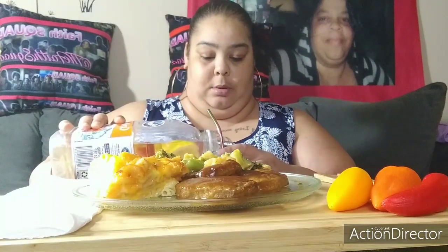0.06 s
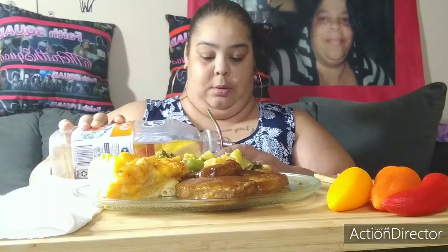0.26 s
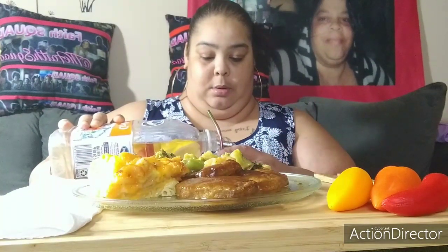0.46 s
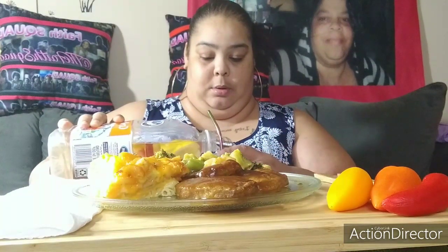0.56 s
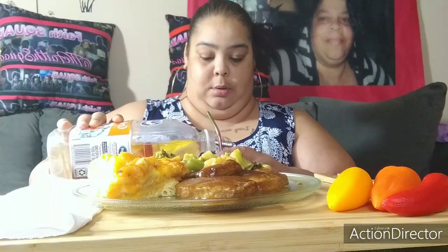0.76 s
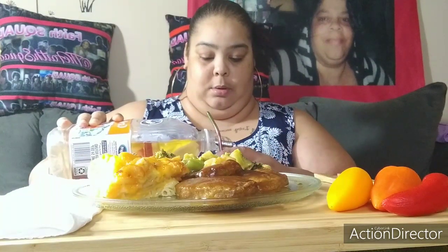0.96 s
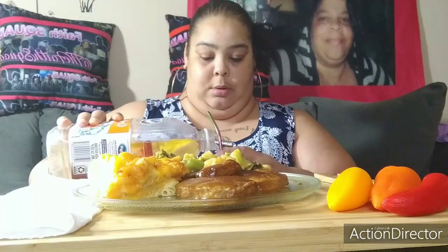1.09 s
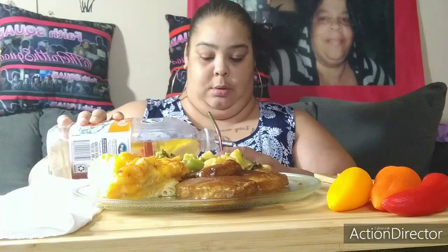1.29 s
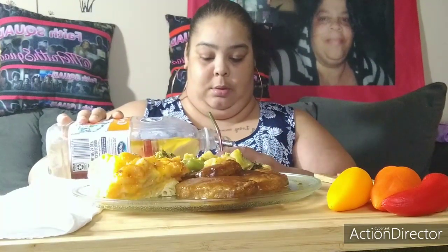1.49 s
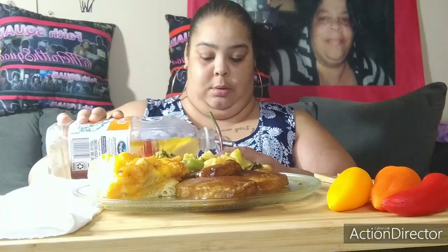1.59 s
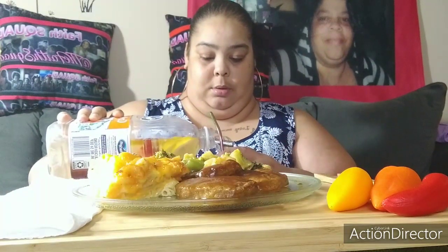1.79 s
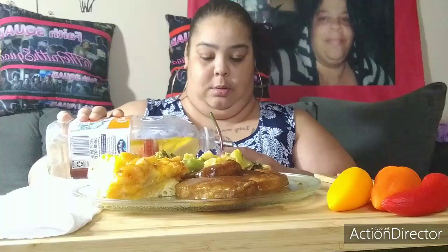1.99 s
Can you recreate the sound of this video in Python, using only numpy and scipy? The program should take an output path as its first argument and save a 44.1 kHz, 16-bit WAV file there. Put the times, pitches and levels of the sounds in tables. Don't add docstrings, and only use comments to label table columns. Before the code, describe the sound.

A drink is poured from a plastic bottle into a plastic cup in irregular glugs and sharp splashes, with bubbles crackling between them, heard close on a phone microphone in a quiet room.

```python
import sys
import numpy as np
from scipy import signal
from scipy.fft import rfft, irfft
from scipy.io import wavfile
from scipy.ndimage import uniform_filter1d

SR = 44100
rng = np.random.default_rng(int(sys.argv[2]) if len(sys.argv) > 2 else 0)


def wav_out(sig):
    wavfile.write(sys.argv[1], SR, np.round(np.clip(np.atleast_2d(sig).T, -1, 1) * 32767).astype(np.int16))


def convert_level_to_amplitude(level_db):
    exponent = np.asarray(level_db, float) / 20
    return 10 ** exponent


N = 90404

# (frequency [Hz], level [dB])
ROOM_SPECTRUM = [(20,-27),(76,3),(250,-2.5),(390,1),(546,-7),(1300,-13),(2200,-31)]
# (time [s], peak level [dB], pitch [Hz])
BOTTLE_THUMPS = [(0.11, -52.5, 62), (0.118, -50, 184), (0.226, -32.5, 288), (0.255, -45, 65.7),
                 (0.258, -39.5, 231), (0.325, -61, 55.4), (0.49, -53.5, 190), (0.608, -34.5, 280),
                 (1.055, -40, 111), (1.075, -35.5, 179), (1.13, -52.5, 60), (1.35, -49, 160),
                 (1.543, -34.5, 148), (1.563, -46, 61.6), (1.608, -35, 78.6), (1.915, -52, 84)]
# (time [s], level [dB])
FLOW_LEVEL = [(0,-59.5),(.3,-56),(.6,-55),(1.17,-57),(1.21,-62),(1.33,-61.5),(1.4,-55.5),(1.5,-62),
              (1.54,-62.5),(1.56,-49),(1.618,-63),(1.66,-59.5),(1.741,-67.5),(1.752,-54),(1.9,-53.5),(2.05,-56)]
# (frequency [Hz], level [dB])
FIZZ_SPECTRUM = [(4200,-24),(4800,-11.5),(5230,8),(6360,-1),(10500,-0.5),(14900,-12),(16000,-6)]
# (time [s], peak level [dB], pitch [Hz])
SINGING_BUBBLES = [(0.0156, -34.5, 9100), (0.0496, -37.5, 6750), (0.079, -32.5, 5800),
                   (0.2985, -32.5, 6200), (0.3061, -34, 5530), (0.3701, -36.5, 6750), (0.505, -37, 6200),
                   (0.63, -33.5, 6130), (0.7721, -38.5, 5940), (0.814, -26, 5110), (0.856, -56, 6600),
                   (0.886, -37.5, 5100), (0.9303, -47, 6600), (1.1358, -30.5, 8360), (1.1441, -35, 9500),
                   (1.1635, -35.5, 5600), (1.1797, -33, 4990), (1.3413, -32.5, 5940), (1.5858, -40, 5900),
                   (1.601, -40, 5040), (1.8203, -37, 5750), (1.8697, -36.5, 5700)]
# (time [s], peak level [dB], pitch [Hz])
BURSTING_BUBBLES = [(0.199, -24, 5100), (0.2328, -27.5, 5040), (0.2772, -29, 9900), (0.3063, -28.5, 5760),
                    (0.3234, -31, 5430), (0.3555, -29.5, 6570), (0.4772, -39, 6460), (0.5127, -33, 6200),
                    (0.5468, -24.5, 8020), (0.5711, -31, 9950), (0.7453, -29.5, 8460),
                    (0.7923, -34.5, 5800), (0.8498, -30, 6000), (0.8623, -29.5, 5500),
                    (0.9004, -30.5, 12200), (0.956, -18.5, 7950), (1.0261, -26, 6260),
                    (1.0486, -25.5, 5860), (1.0765, -26, 5750), (1.2558, -49, 5630), (1.4, -32, 7900),
                    (1.46, -42.5, 5770), (1.4865, -36, 5700), (1.5586, -28, 6100), (1.7503, -30, 5850),
                    (1.7881, -20.5, 5470), (1.9093, -23.5, 7230), (1.9175, -32, 5370), (1.9618, -21, 6440),
                    (2.0208, -24.5, 6250)]
# (time [s], peak level [dB], pitch [Hz])
MORE_BURSTING_BUBBLES = [(0.1346, -50, 5200), (0.1635, -54, 5340), (0.1775, -38.5, 8340), (0.2234, -41, 6350),
                         (0.2573, -30.5, 5300), (0.3371, -28, 5330), (0.4204, -30.5, 8000), (0.4534, -34, 6100),
                         (0.5292, -38, 6240), (0.5985, -51, 6070), (0.6784, -44, 6100), (0.7083, -38, 5700),
                         (0.9817, -30, 5150), (1.1189, -35, 8950), (1.131, -35, 6000), (1.156, -29, 5600),
                         (1.292, -38.5, 5300), (1.3833, -46, 5840), (1.419, -39, 6400), (1.428, -48, 11700),
                         (1.5294, -61, 5410), (1.5449, -36, 5300), (1.6005, -47, 6900), (1.631, -48, 8140),
                         (1.6596, -38, 6060), (1.6756, -40, 6300), (1.6931, -57, 6500), (1.708, -40, 5300),
                         (1.728, -51, 5650), (1.757, -42, 6200), (1.799, -36, 6800), (1.81, -25.5, 12700),
                         (1.8422, -31, 5830), (1.952, -38, 11100), (1.9944, -55, 7890)]
# (frequency [Hz], bandwidth [Hz], level [dB])
CUP_MODES = [(750,67,11.5),(1300,200,-6),(2200,360,3),(2640,160,-50)]
# (frequency [Hz], level [dB])
SPLASH_SPECTRUM = [(150,-19),(250,3),(579,-8.5),(797,-4),(1190,6),(3180,6),(4700,7),(5200,-57)]
# (start [s], end [s], splash level [dB])
SUPPRESSOR_OPEN = [(0.104,0.148,-52),(0.192,0.216,-50),(0.216,0.277,-43),(0.275,0.504,-50.5),(0.62,0.685,-52.5),(0.719,0.725,-38),(0.971,1.006,-50),(1.02,1.142,-42.5),(1.124,1.191,-54),(1.32,1.338,-52.5),(1.54,1.664,-52),(1.342,1.37,-56),(1.785,1.955,-62)]
# (time [s], peak level [dB], pitch [Hz])
AIR_GULPS = [(0.2205, -19, 1066), (0.232, -21.5, 688), (0.256, -24, 421), (0.2615, -28, 620),
             (0.398, -28, 704), (0.406, -25, 804), (0.459, -31, 890), (0.605, -26, 387), (0.611, -22, 780),
             (0.614, -26, 326), (0.712, -28, 760), (0.982, -39.5, 371.5), (1.047, -24, 477),
             (1.07, -19, 687), (1.074, -15.5, 734), (1.091, -26.5, 710), (1.11, -23, 755),
             (1.1185, -14, 641), (1.148, -28.5, 720), (1.294, -23.5, 683), (1.302, -27.5, 700),
             (1.345, -43.5, 413), (1.546, -20.5, 446), (1.557, -18.5, 778), (1.598, -27.5, 740),
             (1.6147, -29, 875), (1.627, -26.5, 830)]
# (time [s], peak level [dB], pitch [Hz])
WALL_SLAPS = [(0.0995, -42.5, 2900), (0.1433, -39.5, 2360), (0.2104, -34, 2200), (0.2194, -20.5, 2210),
              (0.2314, -31.5, 2280), (0.3061, -33.5, 3320), (0.3379, -26, 2000), (0.3683, -34.5, 2260),
              (0.407, -36, 1895), (0.4603, -37, 2570), (0.613, -26, 2170), (0.6535, -40, 3630),
              (0.9787, -31.5, 2680), (1.0251, -38.5, 2220), (1.0483, -30, 2380), (1.075, -21.5, 2640),
              (1.1127, -29.5, 2550), (1.293, -31, 2360), (1.3024, -29.5, 1640), (1.3456, -36.5, 2320),
              (1.5456, -23.5, 2150), (1.5574, -35.5, 2440), (1.6154, -19, 2200)]
# (time [s], peak level [dB], pitch [Hz])
RIM_SMACKS = [(0.1985, -28.5, 4170), (0.2112, -33.5, 1390), (0.2198, -21, 2310), (0.3368, -43, 2240),
              (0.4072, -27, 1760), (0.614, -26, 2000), (1.049, -26.5, 3240), (1.0595, -49, 4200),
              (1.0748, -7, 4870), (1.1195, -35, 3800), (1.14, -29.5, 3660), (1.294, -38.5, 2700),
              (1.5452, -33, 2880), (1.5483, -21.5, 1118), (1.6147, -28.5, 3550), (1.616, -24.5, 4970),
              (1.6178, -25.5, 2200), (1.6295, -52, 1920), (1.7498, -33.5, 2450)]
# (time [s], peak level [dB], pitch [Hz])
LAST_DRIPS = [
    (0.878, -43.5, 2535),
    (0.929, -46.5, 2140),
    (1.418, -43, 3500),
    (1.729, -50.5, 762),
    (1.748, -43, 2130),
    (1.773, -40.5, 1910),
    (1.835, -40.5, 2168),
    (1.919, -49, 882),
    (2.041, -42.5, 2120),
]
TREBLE_EDGES = (7500, 9500, 12200, 17000)
# (start [s], end [s], gain [dB])
TREBLE_DUCKS = [
    [(1.49, 1.54, -12), (1.64, 1.745, -12)],
    [(1.19, 1.34, -2), (1.64, 1.745, -10)],
    [(0, .17, 2.5), (.58, .72, -3), (1.19, 1.39, -7), (1.41, 1.455, -12), (1.5, 1.54, -12),
     (1.63, 1.745, -11), (1.86, 1.9, -6), (1.97, 2.01, -15)],
]


def level(x, db):
    return x * convert_level_to_amplitude(db) / np.sqrt(np.mean(x ** 2))


def band(x, hz, width):
    return signal.lfilter(*signal.iirpeak(hz, hz / width, fs=SR), x)


def colour(x, points):
    hz, db = np.array(points).T
    f = np.arange(N // 2 + 1) * SR / N + 1
    gain_db = np.interp(np.log(f), np.log(hz), db, left=-90, right=-90)
    return irfft(rfft(x) * convert_level_to_amplitude(gain_db), N)


def walk(rate):
    hold = int(SR / rate)
    steps = np.repeat(rng.standard_normal(N // hold + 1), hold)
    return 0.97 * uniform_filter1d(uniform_filter1d(steps, hold), hold)[:N]


def bubbles(rows, cycles, rise, glide, rough, wide=0.39, size=2048):
    out = np.zeros(N + size)
    t = np.arange(size) / SR
    for start, db, hz in rows:
        noise = rng.standard_normal(size + size // 2)
        damping, phase = rng.random(2)
        decays = hz * t / (cycles * (0.95 + 0.69 * damping))
        shape = (1 - np.exp(-decays / rise)) ** 2 * np.exp(-decays)
        bend = 1 + glide * np.minimum(decays, 3) / 3
        tone = np.sin(2 * np.pi * (hz * t * bend + phase))
        hiss = band(band(noise, hz, wide * hz), hz, wide * hz)[-size:]
        ring = shape * (tone + rough * hiss / hiss.std())
        i = int(np.clip(start * SR, 0, N))
        out[i:i + size] += ring / np.abs(ring).max() * convert_level_to_amplitude(db)
    return out[:N]


def crowd(rate, lo_hz, hi_hz, spread_db):
    when, loudness, pitch = rng.random((int(rate * N / SR), 3)).T
    db = -spread_db * np.log(1 - loudness * 0.995)
    return np.c_[when * N / SR, db, lo_hz * (hi_hz / lo_hz) ** pitch]


def room():
    hum = colour(rng.standard_normal(N), ROOM_SPECTRUM)
    return level(hum * convert_level_to_amplitude(3.14 * walk(12.56)), -63.5)


def reverberation(near):
    size, t60_s = 6000, 0.059
    decay = np.exp(-np.log(1000) * np.arange(size) / SR / t60_s)
    echo = band(rng.standard_normal(size), 1020.0, 4300.0) * decay
    echo = echo / np.sqrt(np.sum(echo ** 2))
    return signal.fftconvolve(near, echo)[:N] * convert_level_to_amplitude(-14.5)


def bottle():
    return bubbles(BOTTLE_THUMPS, cycles=0.99, rise=0.23, glide=0.1, rough=0.69, wide=0.89, size=6000)


def fizz(t):
    tiny = crowd(350, 4900.0, 15000.0, spread_db=2.6)
    grains = bubbles(tiny, cycles=6.0, rise=0.3, glide=0.12, rough=0.8, wide=0.4, size=512)
    hiss = rng.standard_normal(N) * convert_level_to_amplitude(1.8 * walk(62.75))
    x = colour(level(grains, 0) + level(hiss, -0.5), FIZZ_SPECTRUM)
    when, db = np.array(FLOW_LEVEL).T
    return level(x, 0) * convert_level_to_amplitude(np.interp(t, when, db))


def pops():
    chirp = bubbles(SINGING_BUBBLES, cycles=10.0, rise=0.5, glide=0.08, rough=0.35, wide=0.25, size=1024)
    bursts = list(BURSTING_BUBBLES) + list(MORE_BURSTING_BUBBLES)
    crack = bubbles(bursts, cycles=6.1, rise=0.13, glide=0.014, rough=1.6, wide=1.0, size=1024)
    crack = band(crack, 2700.0, 14000.0)
    split = signal.cheby1(8, 1, 4800, "high", fs=SR, output="sos")
    return signal.sosfilt(split, chirp + crack) + crack * convert_level_to_amplitude(-14.0)


def cup(x):
    modes = enumerate(CUP_MODES)
    return sum((-1) ** k * convert_level_to_amplitude(db) * band(x, hz, width) for k, (hz, width, db) in modes)


def splash(t):
    churned = crowd(300, 350.0, 4800.0, spread_db=2.8)
    grains = bubbles(churned, cycles=5.0, rise=0.3, glide=0.12, rough=0.5, size=1024)
    rush = rng.standard_normal(N) * convert_level_to_amplitude(3.1 * walk(54.7))
    x = level(grains, 0) + level(rush, -4.5)
    x = colour(x + cup(x), SPLASH_SPECTRUM)
    db = np.full(N, -68.0)
    for start, end, open_db in SUPPRESSOR_OPEN:
        db[(t >= start) & (t < end)] = open_db
    slew_s = 0.0084
    return level(x, 0) * convert_level_to_amplitude(uniform_filter1d(db, int(slew_s * SR)))


def glugs():
    gulp = bubbles(AIR_GULPS, cycles=1.6, rise=0.55, glide=0.05, rough=0.85, wide=0.9)
    slap = bubbles(WALL_SLAPS, cycles=5.3, rise=0.024, glide=0.009, rough=0.48, wide=0.92)
    smack = bubbles(RIM_SMACKS, cycles=2.0, rise=0.04, glide=-0.1, rough=0.8, wide=0.9, size=512)
    drip = bubbles(LAST_DRIPS, cycles=7.6, rise=0.043, glide=0.168, rough=0.87)
    return gulp * convert_level_to_amplitude(-5.5) + slap + smack + drip


def suppress_treble(x, t):
    f, spectrum = np.arange(N // 2 + 1) * SR / N, rfft(x)
    for lo, hi, rows in zip(TREBLE_EDGES, TREBLE_EDGES[1:], TREBLE_DUCKS):
        db = sum(gain * ((t >= start) & (t < end)) for start, end, gain in rows)
        db = uniform_filter1d(db * 1.0, int(SR / 200)) + 3.0 * walk(24)
        treble = irfft(spectrum * ((f >= lo) & (f < hi)), N)
        x = x + treble * (convert_level_to_amplitude(db) - 1)
    return x


def scene():
    t = np.arange(N) / SR
    near = glugs() + pops()
    direct = suppress_treble(near + fizz(t), t)
    return (room() + reverberation(near) + bottle() + splash(t) + direct)[None]


def top_cut(x):
    return signal.sosfilt(signal.butter(12, 16500, fs=SR, output="sos"), x)


def record(dry):
    lowpass = signal.ellip(8, 0.2, 50, 15700, fs=SR, output="sos")
    mix = signal.sosfilt(lowpass, dry)
    return top_cut(mix)


dry = scene()
out = record(dry)
wav_out(out)
```